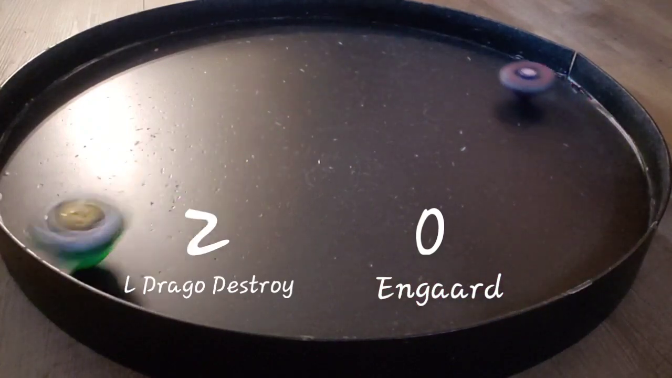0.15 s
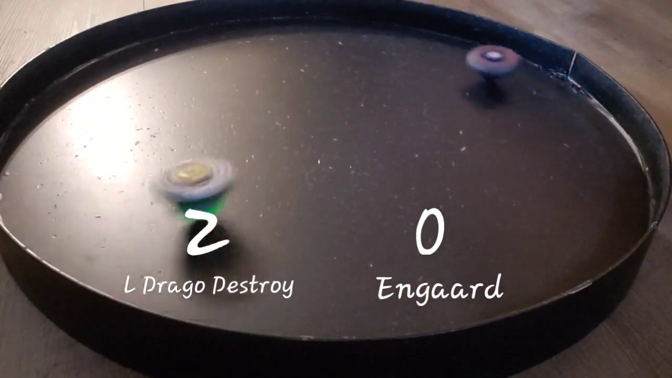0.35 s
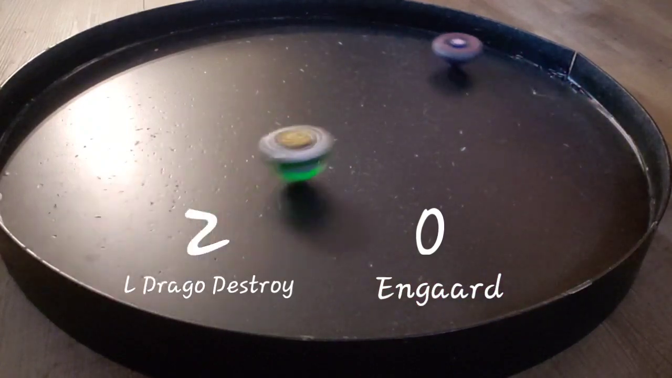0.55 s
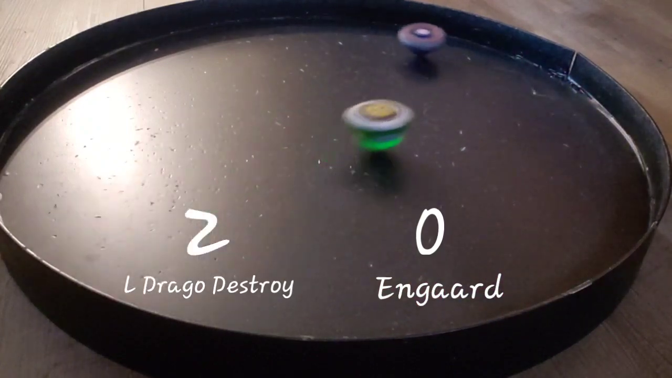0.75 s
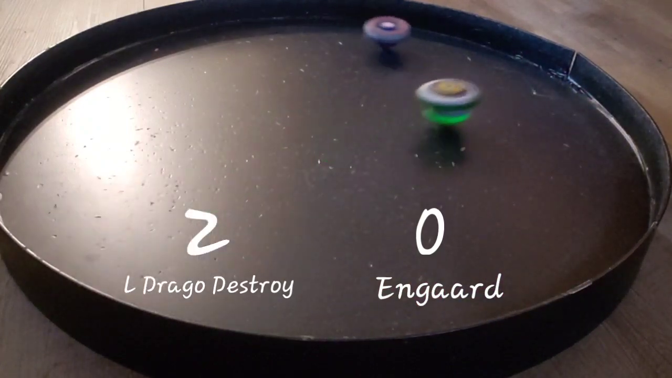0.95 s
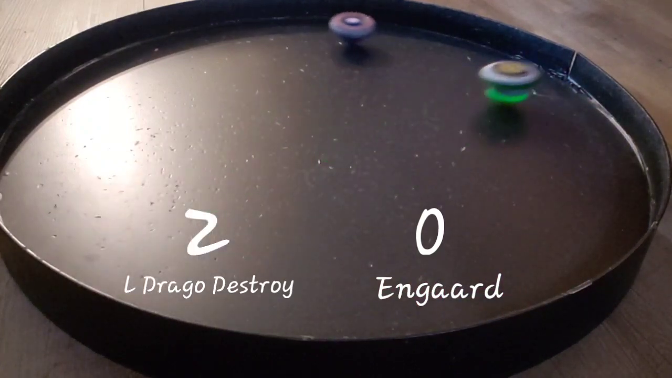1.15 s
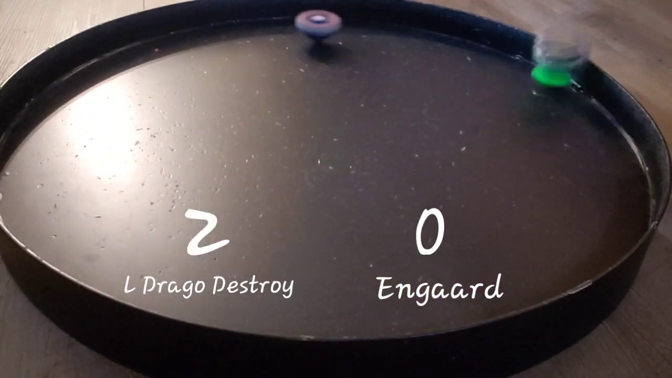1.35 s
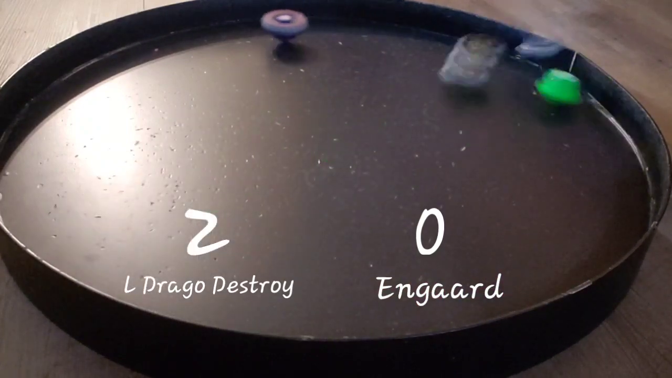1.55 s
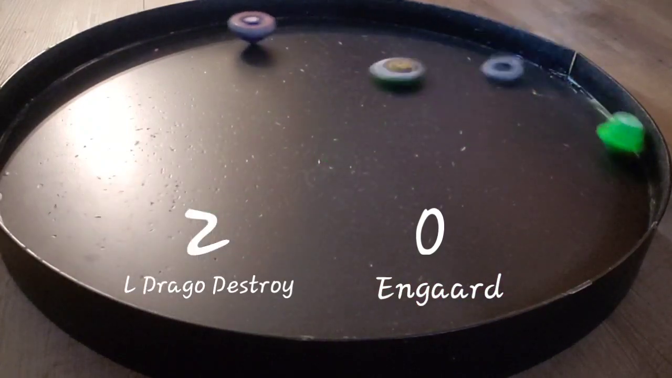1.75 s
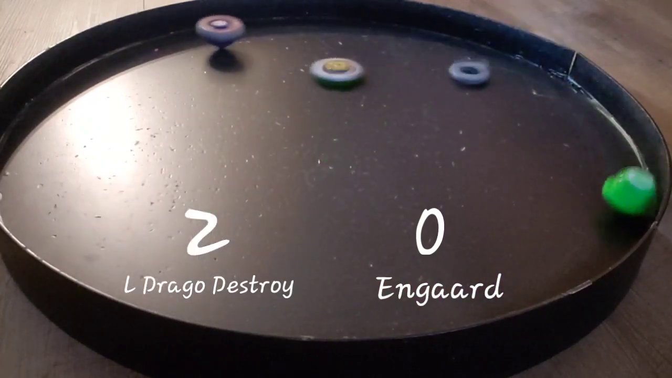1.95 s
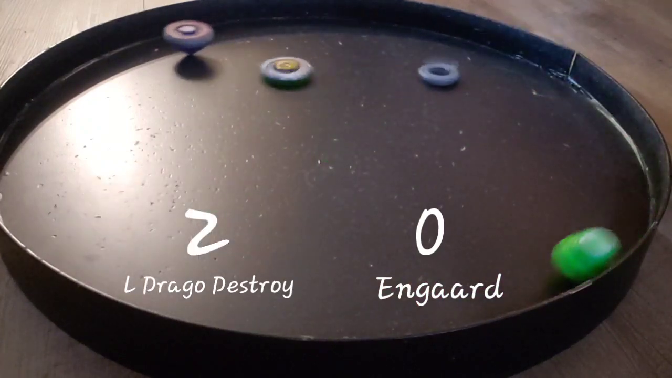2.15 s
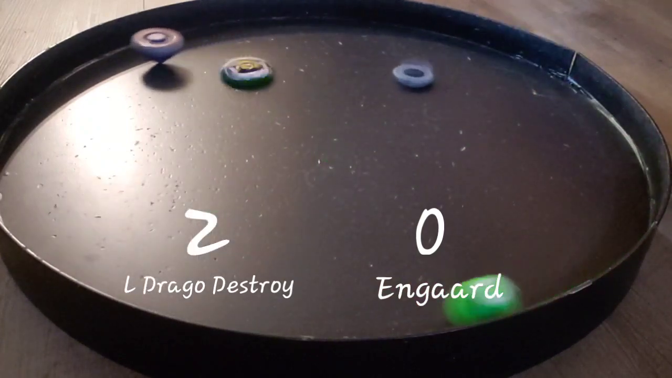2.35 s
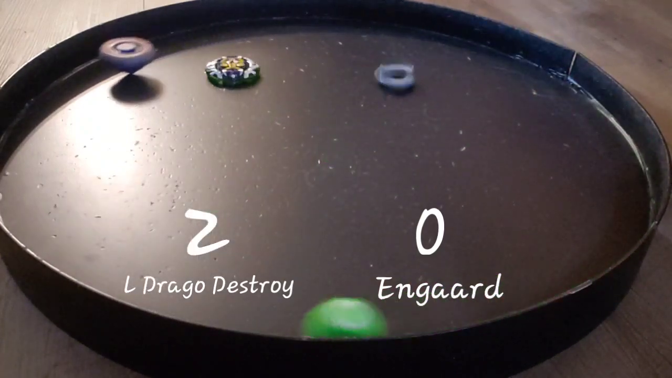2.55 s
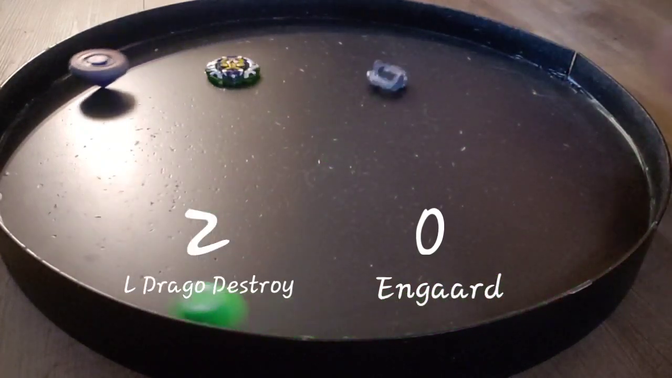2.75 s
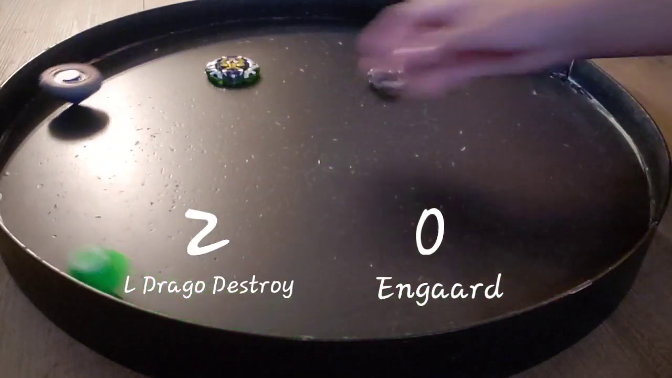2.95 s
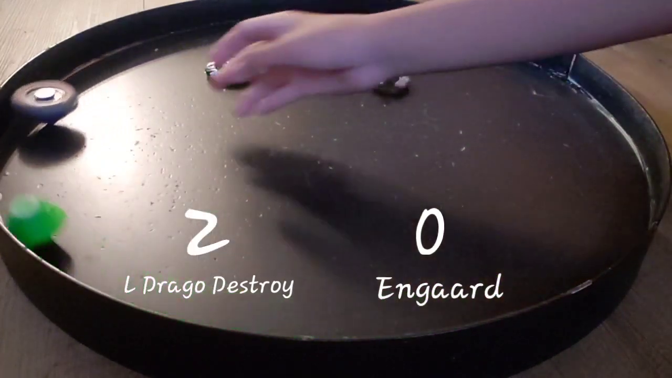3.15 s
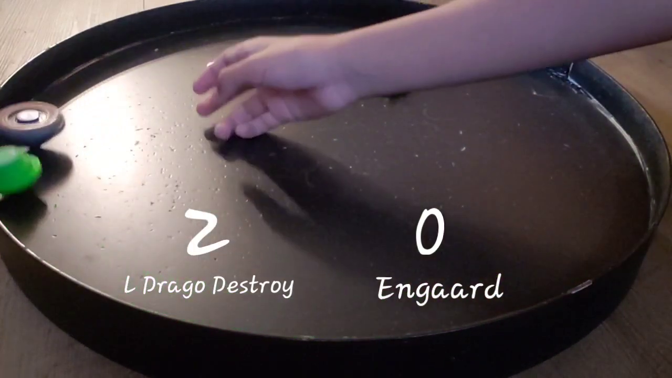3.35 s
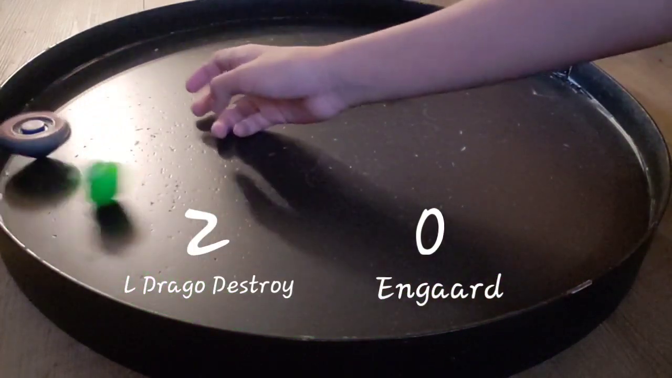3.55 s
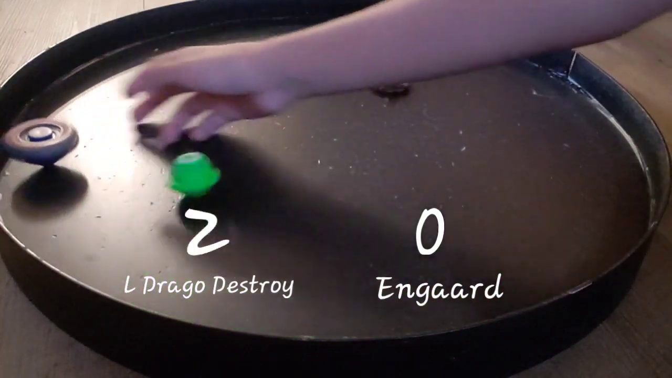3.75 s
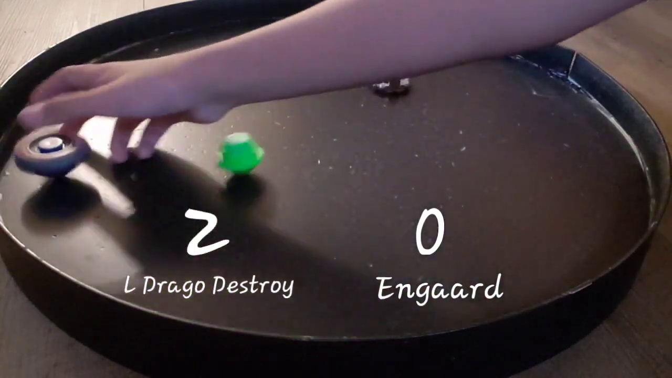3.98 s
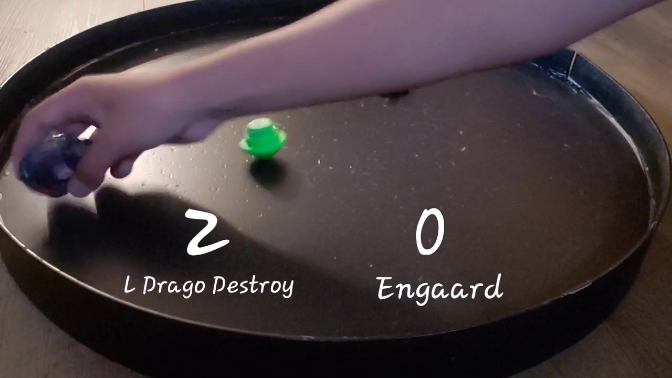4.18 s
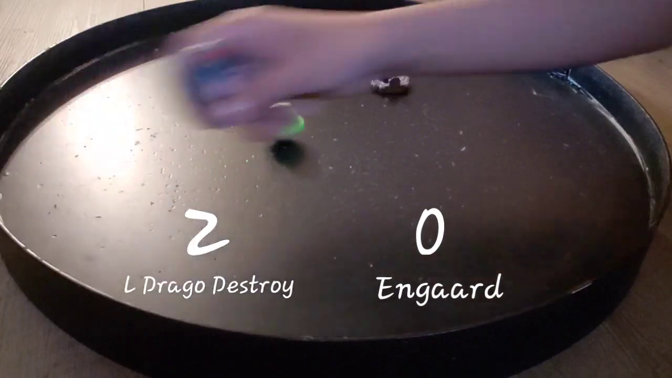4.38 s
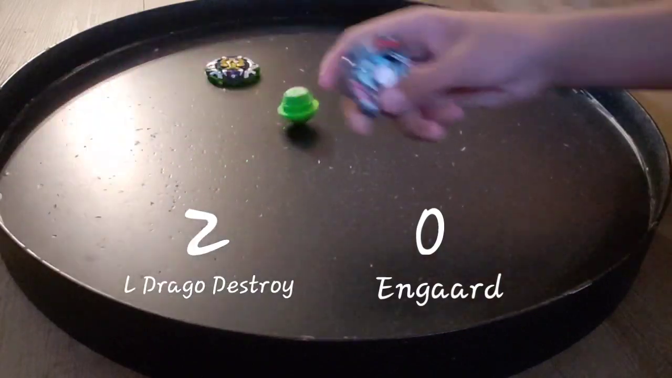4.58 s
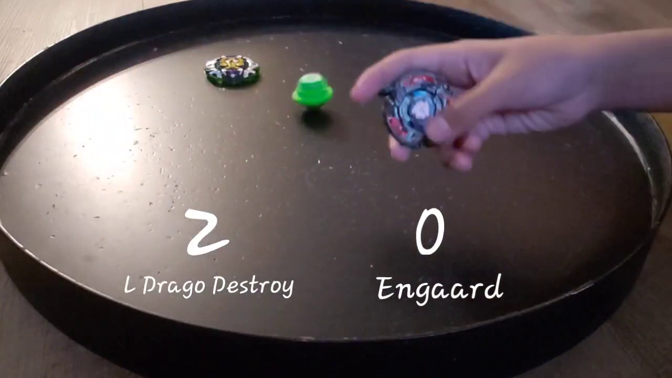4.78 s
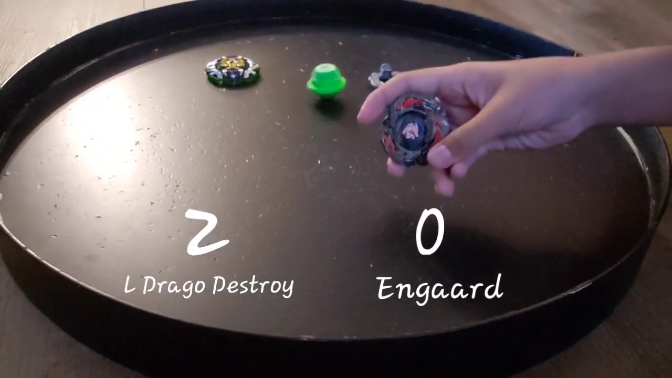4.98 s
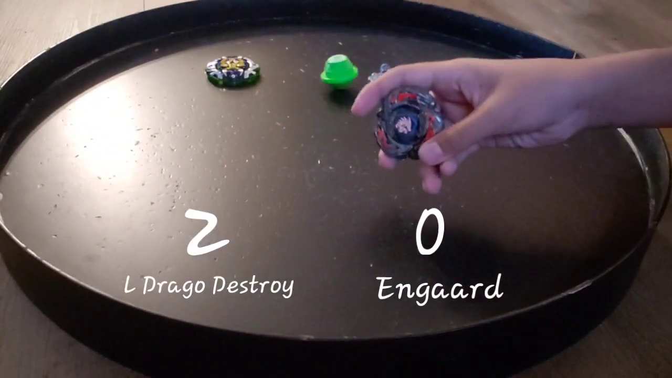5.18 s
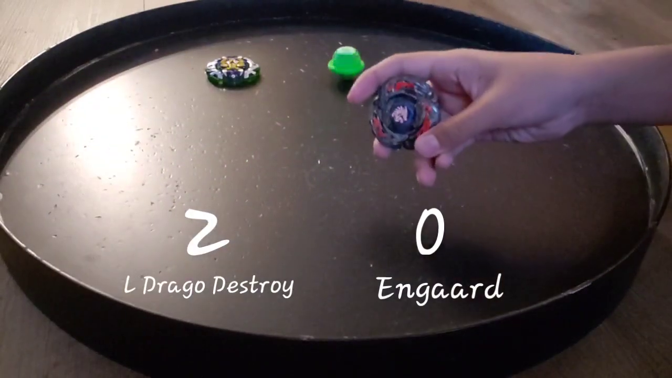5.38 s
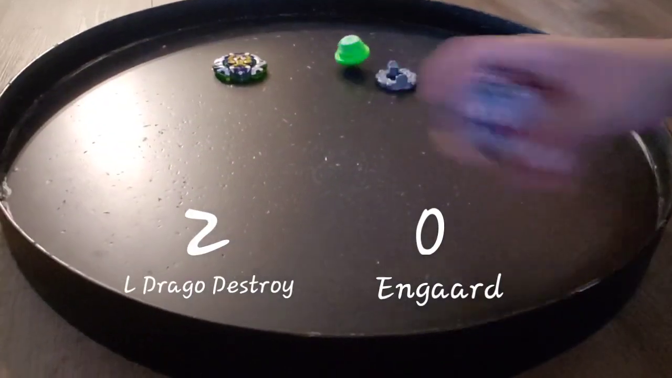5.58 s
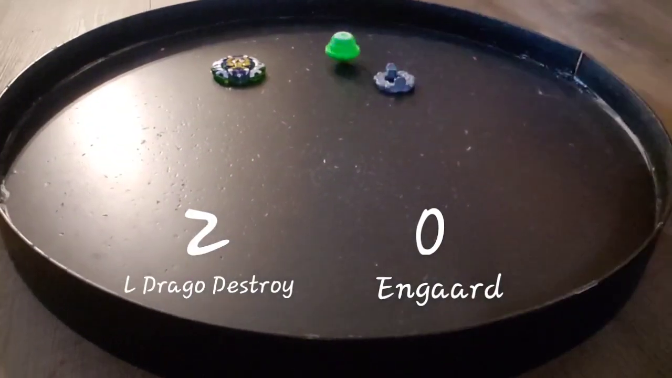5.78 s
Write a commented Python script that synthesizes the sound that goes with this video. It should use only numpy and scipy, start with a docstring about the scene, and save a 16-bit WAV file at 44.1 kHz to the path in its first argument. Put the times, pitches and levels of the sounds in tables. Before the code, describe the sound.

A toy spinning top grinds softly in a metal pan, clangs off the rim and bursts apart, its pieces knocking, rattling and ticking to rest.

```python
"""Two toy tops spin in a shallow metal pan (grinding, chirping noise with skips); one strikes the rim and bursts apart.
Clashes are bunched contact pulses that ring the pan's modes; plastic pieces knock and tumble in shaped bursts.
The loose metal wheel rasps and rings, and the plastic tip rattles round the wall in uneven taps and dry ticks.
A hand snatches the other top (a short chatter of teeth) and bumps the table (soft, deep decaying tones).
A small room answers with a diffuse tail; a low air noise runs throughout and a faint hiss comes and goes on the left."""
import sys
import numpy as np
from scipy import signal
from scipy.fft import rfft, irfft
from scipy.io import wavfile
from scipy.ndimage import uniform_filter1d

SR = 44100
rng = np.random.default_rng(int(sys.argv[2]) if len(sys.argv) > 2 else 0)


def to_wav(s):
    """Save 16-bit WAV."""
    ch = np.atleast_2d(s).T  # columns
    pcm = np.round(np.clip(ch, -1, 1) * 32767)  # PCM
    wavfile.write(sys.argv[1], SR, pcm.astype(np.int16))


N = 256662

# metal on metal and on plastic: (time [s], lead of the graze [s], level [dB], extra bass [dB],
# extra treble [dB], pitch of the struck part [Hz], boost at that pitch [dB])
CLASHES = [(0.299, 0.0029, -15.5, 2, -5.5, 1620, 8), (0.38, 0, -38.5, -22, -24, 1550, 15),
           (1.4717, 0.0029, -16.5, -3.5, -3, 1960, 5.5), (1.6119, 0.0011, -24.5, -7, -5, 1540, 9),
           (1.6234, 0.0087, -26.5, -3.5, -4, 13500, 11), (1.628, 0.0054, -26.5, -16, -1.5, 13300, 13),
           (1.7053, 0.0017, -18.5, 1, -7, 4240, 4), (1.847, 0.00087, -22.5, -14.5, -8, 3130, 8),
           (2.03, 0, -28, -12, -25, 6500, -5), (3.4505, 0.0041, -24.5, 2.5, -17.5, 1645, 15.5),
           (3.5411, 0, -28.5, 4, 3.5, 3800, 17.5), (3.552, 0.00014, -34, -12, -2, 3850, 9),
           (3.567, 0.003, -29.5, -5.5, 3.5, 1844, 12), (3.579, 0, -24.5, 2.5, -13, 1610, 15.5),
           (4.2509, 0.0026, -47.5, 1, 3.5, 560, 9), (4.318, 0.0045, -54, -7, 7, 4740, 7)]
# tone of metal contacts: (frequency [Hz], gain [dB])
CLASH_COLOUR = [(50, -30.5), (110, -13), (340, -6.5), (560, -3.5), (800, -8), (1250, -3.5), (1800, -4),
                (2500, -8), (4000, -7), (6000, -12), (8200, -17.5), (10500, -4), (13500, -11), (16000, -24)]
# tone of plastic contacts: (frequency [Hz], gain [dB])
KNOCK_COLOUR = [(50, -36), (110, -16), (200, -12), (350, -15.5), (600, -5.5), (850, -4), (1450, 3),
                (2700, 1), (3600, -1), (4300, -9), (5200, -14.5), (8200, -33), (10500, -42.5), (15000, -44)]
# modes of the pan: (frequency [Hz], t60 [s], gain struck at the left wall [dB], gain struck at the far wall [dB])
PAN_MODES = [(179.6, 0.6, -13, -22), (338, .3, -8.5, -12.5), (587, 0.28, -8, -10.5), (808, .23, -23, -7),
             (880, 0.053, -3, -13), (1133, .3, -18, -9), (1230, 0.23, -14, 0), (1450, .25, -7, -14),
             (1552, 0.21, -3.5, -4), (1750, .13, 1, -16), (1836, .35, -13.5, -5.5), (2013, 0.096, -15.5, 1),
             (2390, 0.37, -15, -9.5), (3060, .4, -12.5, -13), (4240, .25, -15.5, -13.5)]

TIME = np.arange(N) / SR


def undb(db):
    """Decibels to gain."""
    return 10 ** (np.asarray(db) / 20)


def rms(x):
    """Root mean square of a sound."""
    return np.sqrt(np.mean(x ** 2))


def unit(x):
    """Scale to rms 1."""
    return x / rms(x)


def freqs(size):
    """Frequencies of the bins of a spectrum, kept at 1 Hz or above for the logarithm."""
    return np.maximum(np.arange(size // 2 + 1) * SR / size, 1)


SIZE = 4096  # samples in one short blow
T, HZ = TIME[:SIZE], freqs(SIZE)


def along(points, hz):
    """Read (Hz, value) points on a log-frequency axis."""
    f, value = np.transpose(points)
    return np.interp(np.log(hz), np.log(f), value)


def colour(x, db):
    """Causal (minimum-phase) filter with the given gain in each bin, made by folding the cepstrum."""
    size = x.shape[-1]
    cepstrum = irfft(np.log(undb(db)), size)
    cepstrum[1:size // 2] *= 2
    cepstrum[size // 2 + 1:] = 0
    return irfft(rfft(x) * np.exp(rfft(cepstrum)), size)


def convolve(x, response):
    """Pass a sound through a response."""
    return signal.fftconvolve(x, response, axes=-1)[:, :N]


def ringing(modes):
    """Impulse response of damped modes (Hz, dB, t60 s), each with its gain at resonance."""
    t = TIME[:SR // 2]
    response = 0
    for hz, db, t60 in modes:
        peak = undb(db) * 2 * np.log(1000) / (t60 * SR)
        response = response + peak * undb(-60 * t / t60) * np.sin(2 * np.pi * hz * t)
    return response[None]


def resonance(hz, db, octaves):
    """Boost in dB around one pitch, as from a cluster of close, quickly damped modes."""
    return db / (1 + (np.log2(HZ / hz) / octaves) ** 4)


def pair(size, apart, shared_hz=700):
    """Noise at two close microphones: they share the long waves and differ in the short ones."""
    mid, side = rng.standard_normal((2, size))
    hz = freqs(size)
    side = irfft(rfft(side) * apart * (0.5 + 1.07 * hz / np.hypot(hz, shared_hz)), size)
    return np.array([mid + side, mid - side]) / np.sqrt(2)


def noise(points, apart):
    """Coloured stereo noise at rms 1."""
    return unit(colour(pair(N, apart), along(points, freqs(N))))


def wander(rate):
    """Slow chance with a spread of 1, changing about rate times a second."""
    return unit(uniform_filter1d(rng.standard_normal(N), int(SR / rate)))


def swell(start, end, db, attack, release):
    """Gain over time: rise from the start, hold until the end, then fall."""
    rise = np.clip((TIME - start) / attack, 0, 1)
    fall = np.clip(1 - (TIME - end) / release, 0, 1)
    return undb(db) * rise * fall


def add(out, s, x):
    """Mix a short sound in at time s."""
    i = int(s * SR)
    out[:, i:i + x.shape[1]] += x[:, :N - i]


def punch(x):
    """Scale a blow to rms 1 over its first 5 ms between 1.1 and 6 kHz."""
    band = signal.sosfilt(signal.butter(3, [1100, 6000], "band", fs=SR, output="sos"), x)
    return x / rms(band[:, :SR // 200])


def contact(scatter_db, scatter_s, linger_db, linger_s, dull_hz, lag=4):
    """One contact: a direct pulse, then duller waves that cross the pan and come back from its wall."""
    fade = undb(scatter_db) * np.exp(-T / scatter_s) + undb(linger_db) * np.exp(-T / linger_s)
    onset = 1 - np.exp(-T / 0.00017)
    x = colour(pair(SIZE, 0.73) * fade * onset, -10 * np.log10(1 + (HZ / dull_hz) ** 2))
    # the direct pulse reaches the right side lag samples sooner
    x[0, max(lag, 0)] -= .8
    x[1, max(-lag, 0)] -= 1
    return x


def spin(wobble_hz=36, depth=0.32, flutter_db=3.0, chirp_db=-9, chirp_spread_db=4.5):
    """The tips rub the pan unevenly, ever more softly; in each wobble they press harder and chirp."""
    # tone of the rubbing: (frequency [Hz], gain [dB])
    spin_colour = [(40, -14.5), (130, -7), (270, 3), (350, -8), (460, 1), (700, -15.5), (1200, -23.5),
                   (1500, -8), (1680, -24.5), (1850, -16), (2400, -25.5), (4400, -26.5), (5200, -24),
                   (6500, -48.5), (12000, -35), (16000, -44.5)]
    # tone of the chirp: (frequency [Hz], gain [dB])
    chirp_colour = [(1150, -15.5), (1550, 0.5), (2400, -14), (4400, -11.5), (5150, 0), (6200, -27.5),
                    (9000, -40.5)]
    start_db, sag_db_per_s = -53.5, 2.4
    end_s, stop_s = 3.773, 0.11  # the grind fades out over stop_s from end_s
    phase = np.cumsum(wobble_hz * (1 + 0.1012 * wander(7.3))) / SR
    press = np.sin(2 * np.pi * phase)
    level = undb(start_db - sag_db_per_s * TIME + flutter_db * wander(8.2))
    level = level * np.clip(1 - (TIME - end_s) / stop_s, 0, 1)
    chirp_level = np.maximum(press, 0) ** 2 * undb(chirp_db + chirp_spread_db * wander(25))
    chirp = noise(chirp_colour, 0.52) * chirp_level
    rub = noise(spin_colour, 0.4) * (1 + depth * press)
    return (rub + chirp) * level


def room_air(lean_db=1.5):
    """Steady low hum of the air, coloured noise leaning a little to the right."""
    # tone of the air: (frequency [Hz], gain [dB])
    air_colour = [(20, -22), (38, -12), (58, 5.5), (90, -15), (180, -2), (300, -15.5), (600, -24.5),
                  (1400, -33.5), (2200, -28), (3200, -35), (5000, -38), (8000, -48), (11000, -35),
                  (16000, -37)]
    return undb(-68.5) * noise(air_colour, 0.36) * undb([[-lean_db], [lean_db]])


def skips(skid_db=-17, skid_s=0.018):
    """A spinning tip skips over a scratch: a hollow tock, a momentary skid and one lighter hop."""
    # skips: (time [s], level [dB], extra treble [dB])
    landings = [(.106, -51, -1.5), (0.269, -51.5, -10), (.622, -52, -23), (0.777, -55.5, -36),
                (.816, -64, -25), (0.8895, -48, -15), (0.987, -52.5, -6), (1.018, -51.5, -14),
                (1.076, -45.5, -11.5), (1.204, -47, -11), (2.369, -54, -1), (2.999, -48, -7)]
    # extra body of a skip: (frequency [Hz], gain [dB])
    body = [(450, 10), (900, 8), (1200, -0.5), (1550, 5), (2500, -1.5)]
    hop_s, hop_db = 0.039, -9  # the second landing
    out = np.zeros((2, N))
    for s, db, treble_db in landings:
        shade = along(body + [(5500, 0), (9000, treble_db)], HZ)
        for hop in range(2):
            tock = contact(-11, 0.0036, skid_db, skid_s, 9000)
            tock = colour(tock, along(CLASH_COLOUR, HZ) + shade)
            add(out, s + hop * hop_s, undb(db + hop * hop_db) * punch(tock))
    return out


def strike(db, bass_db, treble_db, hz, ring_db, ring_octaves=0.17, scatter_db=-12, linger_db=-25, count=3):
    """Wheel teeth catch several times in a few ms; the struck part rings in a cluster of close modes."""
    shade = along([(330, bass_db), (900, 0), (4500, 0), (10000, treble_db)], HZ)
    ring = resonance(hz, ring_db, ring_octaves)
    x = np.zeros((2, SIZE))
    for tooth in range(count):
        delay = int(tooth * rng.uniform(.0005, .0011) * SR)
        bite = contact(scatter_db, .002, linger_db, .012, 16000, lag=0)
        x += .8 ** tooth * np.roll(bite, delay, axis=1)
    return undb(db) * punch(colour(x, along(CLASH_COLOUR, HZ) + shade + ring))


def clashes():
    """A spinning wheel grazes first, then bites with several teeth; a square hit clicks only once."""
    graze_db, graze_bass_db, graze_treble_db = -7, -8, 3.5  # a lighter, brighter touch than the bite
    out = np.zeros((2, N))
    for s, lead, db, bass_db, treble_db, hz, ring_db in CLASHES:
        if lead > 0:
            graze = strike(db + graze_db, bass_db + graze_bass_db, treble_db + graze_treble_db, hz, ring_db)
            add(out, s - lead, graze)
            add(out, s, strike(db, bass_db, treble_db, hz, ring_db))
        else:
            click = strike(db, bass_db, treble_db, hz, ring_db, scatter_db=-20, linger_db=-32, count=1)
            add(out, s, click)
    return out


def clang(far, scatter_db=1):
    """Pan modes after a blow on the wall: the spot sets their balance, the higher ones differ by side."""
    t, out = TIME[:SR // 2], 0
    for hz, t60, left_db, far_db in PAN_MODES:
        split = min(hz / 1500, 1) * rng.uniform(.3, 1.2)  # phase offset of each side [rad]
        phase = rng.uniform(0, 2 * np.pi) + split * np.array([[1], [-1]])
        db = (far_db if far else left_db) + scatter_db * rng.standard_normal()
        out = out + undb(db - 60 * t / t60) * np.sin(2 * np.pi * hz * t + phase)
    return out * (1 - np.exp(-t / .001))


def clangs(clang_db=-16.5):
    """Each glancing clash sets the pan ringing, in step with its force."""
    out = np.zeros((2, N))
    for s, lead, db, *_ in CLASHES:
        if lead > 0:
            far = 1 < s < 2.5  # blows in this span [s] land on the far wall
            add(out, s, undb(db + clang_db) * clang(far))
    return out


def roll(rate=175, spread_db=1.0, count=16):
    """The ribbed tip trundles along the wall: ribs tap unevenly, each time on one of many spots of the pan."""
    # tone of the taps: (frequency [Hz], gain [dB])
    roll_colour = [(50, -36.5), (170, -12), (350, -9), (600, 3), (900, -2), (1450, 4.5), (2300, 0.5),
                   (3600, -11), (4800, -27), (8200, -41.5), (10500, -35.5), (15000, -43)]
    times = np.cumsum(rng.uniform(.25, 1.75, 2000)) / rate
    at = (times[times < TIME[-1]] * SR).astype(int)
    strength = undb(spread_db * np.clip(rng.standard_normal(len(at)), -2, 1.4))
    spot = rng.integers(count, size=len(at))
    out = np.zeros((2, N))
    for k in range(count):
        taps = np.zeros((1, N))
        taps[0, at] = strength * (spot == k)
        tap = contact(-22, .0025, -31, .013, 2200, lag=1)
        out += convolve(taps, colour(tap, along(roll_colour, HZ)))
    return unit(out) * swell(start=1.65, end=3.49, db=-39.5, attack=.039, release=.014)


def wheel(rate=260, rasp_db=-1, flutter_db=2):
    """The loose metal wheel rolls on its edge: random taps ring its modes over a fine rasp, then it settles."""
    # modes of the wheel: (frequency [Hz], relative gain [dB], t60 [s])
    wheel_modes = [(6430, -4.5, .06), (6480, -7.5, .08), (9580, -11, 0.016)]
    start_s, end_s, attack_s, release_s = 1.655, 3.59, 0.044, 0.35
    landing_db, fade_db_per_s, floor_db = -49, 21, -78.5  # the landing fades towards a faint floor
    taps = (rng.random(N) < rate / SR) * rng.normal(1, 0.67, (2, N))
    rasp_colour = [(3000, -33.5), (6500, -1.0), (8200, -11.0), (9800, -3.5), (13000, -5.0), (16000, -21.0)]
    rasp = noise(rasp_colour, 0.57)
    ring = unit(convolve(taps, ringing(wheel_modes)))
    settle = undb(landing_db - fade_db_per_s * (TIME - start_s)) + undb(floor_db)
    level = settle * swell(start_s, end_s, flutter_db * wander(20), attack_s, release_s)
    return (ring + undb(rasp_db) * rasp) * level


def knock(db, hardness, scatter_db, lag):
    """Plastic on the pan: a harder corner gives a brighter knock, and a second corner follows."""
    rebound_s, rebound_db = .0062, -7.5  # typical gap, and level of the second corner
    octaves = np.log2(np.clip(HZ, 1000, 7000) / 2200)
    first, second = (contact(scatter_db, .0018, scatter_db - 13, .007, 4500, lag) for corner in range(2))
    delay = int(rebound_s * rng.uniform(0.73, 1.25) * SR)
    x = first + undb(rebound_db) * np.roll(second, delay, axis=1)
    return undb(db) * punch(colour(x, along(KNOCK_COLOUR, HZ) + hardness * octaves))


def knocks():
    """Loose pieces drop and bounce on the pan; strong knocks are brighter and send relatively weaker waves."""
    # bounces: (time [s], level [dB])
    bounces = [(1.678, -24), (1.7405, -13.5), (1.7895, -24), (1.801, -24.5), (1.8468, -16), (1.8909, -19),
               (1.9209, -21), (1.9618, -20.5), (2.003, -24.5), (2.0313, -20), (2.038, -28.5),
               (2.0687, -26.5), (2.1501, -23), (5.573, -72.5)]
    light_db = -33.5  # level of a light knock
    hardness_db, harder_per_db = -.5, 0.16  # brightness of a light knock [dB per octave], its rise with force
    scatter_db, scatter_per_db = -8.5, -0.23  # waves across the pan from a light knock, their change with force
    out = np.zeros((2, N))
    for s, db in bounces:
        force = max(db - light_db, 0)
        hardness = hardness_db + harder_per_db * force
        add(out, s, knock(db, hardness, scatter_db + scatter_per_db * force, lag=3))
    return out


def tumbles(ring_hz=1250, ring_db=2, scuff_s=0.0039):
    """A piece tumbles end over end: an even run of short, blunt scuffs, one per turn, on a level curve."""
    # runs: (start [s], end [s], turn [s], loudest at [s], loudest level [dB], fade by the end [dB],
    # hardness [dB per octave])
    runs = [(2.065, 2.28, .0281, 2.11, -32.5, -1.5, 3.5), (3.639, 3.808, .0266, 3.70, -34, 10.5, -8.5)]
    out = np.zeros((2, N))
    octaves = np.log2(np.clip(HZ, 1500, 7000) / 2200)
    for start, end, turn_s, loudest_s, db, fade_db, hardness in runs:
        shade = along(KNOCK_COLOUR, HZ) + hardness * octaves + resonance(ring_hz, ring_db, .2)
        for s in np.arange(start, end, turn_s):
            off_peak = (s - loudest_s) / (end - loudest_s)
            scuff = contact(0, scuff_s, -30, .008, 4500, lag=0)
            add(out, s, undb(db - fade_db * off_peak ** 2) * punch(colour(scuff, shade)))
    return out


def raps(ring_hz=2500, ring_db=5, scatter_db=-15):
    """Dry, separate ticks of the tip on the wall, varying randomly in pitch."""
    # ticks: (time [s], level [dB])
    ticks = [(2.2635, -31.5), (2.2922, -29), (2.3115, -35.5), (2.388, -28.5), (2.4505, -29.5),
             (2.4543, -31.5), (2.4881, -29), (2.5252, -34), (2.5411, -39), (2.556, -33.5), (2.5642, -29.5),
             (2.6116, -34.5), (2.618, -30.5), (2.6488, -35), (2.662, -31), (2.669, -30.5), (2.6767, -46),
             (2.712, -32.5), (2.723, -29.5), (2.7296, -37), (2.7664, -34.5), (2.776, -30), (2.7823, -32.5),
             (2.8047, -30.5), (2.8476, -38), (2.9228, -31.5), (2.941, -39), (3.0168, -32), (3.0225, -35.5),
             (3.0527, -37.5), (3.0855, -35.5), (3.0903, -32), (3.1463, -34.5), (3.2067, -31.5),
             (3.247, -31.5), (3.263, -31), (3.2699, -31.5), (3.2949, -31), (3.3096, -31.5), (3.3156, -32.5),
             (3.3299, -29.5), (3.3695, -31.5), (3.406, -32), (3.434, -29.5), (3.4703, -29.5), (3.487, -38)]
    # the tip crosses from right to left: (time [s], lag of the left side [samples])
    crossing = [(2.1, 2), (2.7, 2.5), (3.4, -4)]
    out = np.zeros((2, N))
    for s, db in ticks:
        lag = int(round(np.interp(s, *np.transpose(crossing))))
        ring = resonance(ring_hz * 2 ** rng.uniform(-.5, .5), ring_db, .3)
        tick = contact(scatter_db, .0018, scatter_db - 15, .006, 4500, lag)
        add(out, s, undb(db) * punch(colour(tick, along(KNOCK_COLOUR, HZ) + ring)))
    return out


def hiss(grain_db=1.6):
    """A faint, narrow, grainy hiss that swells, and ticks once, in the left microphone only."""
    # swells: (start [s], end [s], level [dB], attack [s], release [s])
    swells = [(4.109, 4.25, -70, 0.035, 0.13), (4.407, 4.576, -66.5, 0.073, 0.21),
              (4.751, 5.298, -65, 0.1, 0.38), (5.242, 5.242, -51.5, 0.0017, 0.0039),
              (5.494, 5.819, -66, 0.22, 0.13)]
    # tone of the hiss: (frequency [Hz], gain [dB])
    hiss_colour = [(300, -33), (1400, -20.5), (2150, 1), (3200, -6), (4500, -21.5), (8000, -39.5)]
    level = sum(swell(*row) for row in swells) * undb(grain_db * wander(100))
    left_only = np.array([[1], [0]])
    return noise(hiss_colour, 1) * level * left_only


def grab(rate=1500, bass_db=12):
    """Fingers press the top to the pan: its teeth chatter on the metal in a dense burst of random ticks."""
    teeth = (rng.random(N) < rate / SR) * rng.standard_normal((1, N))
    shade = along([(600, bass_db), (2000, 0)], HZ)
    tick = colour(contact(-16, .002, -29, .012, 16000), along(CLASH_COLOUR, HZ) + shade)
    chatter = unit(convolve(teeth, tick))
    return chatter * swell(start=4.241, end=4.255, db=-48, attack=.007, release=.055)


def bumps(rise_cycles=0.64):
    """The hand pushes the table under the pan: a short tock, with deep modes that build up just after."""
    # pushes: (time [s], relative level [dB], extra deep bass [dB], extra midrange [dB])
    pushes = [(4.25, -44.5, -16, -3.5), (4.73, -61, -1, -20), (5.239, -61, -8, -13),
              (5.591, -51.5, 2, -6.5), (5.6457, -49.5, 0, -3), (5.785, -60.5, 4, -12)]
    # modes of the table: (frequency [Hz], relative gain [dB], t60 [s])
    table_modes = [(74, 3.5, 0.097), (193.3, -2, 0.084), (511.4, -5, 0.043), (1142, -22, .03)]
    out = np.zeros((2, N))
    for s, db, deep_db, mid_db in pushes:
        for hz, mode_db, t60 in table_modes:
            tilt_db = along([(80, deep_db), (200, 0), (500, mid_db)], hz)
            decay = undb(db + mode_db + tilt_db - 60 * T / t60)
            rise = 1 - np.exp(-(T * hz / rise_cycles) ** 2)
            tone = decay * rise * np.sin(2 * np.pi * hz * T)
            add(out, s, tone[None] * 2)
    return out


def room(build_s=0.0016):
    """Diffuse tail of the room: noise in octave bands, each with its own decay, scaled to unit energy."""
    # room decay: (frequency [Hz], t60 [s])
    room_t60 = [(100, 0.18), (300, 0.56), (800, 0.42), (2000, 0.4), (5000, 0.42), (13000, 0.32)]
    size = SR * 3 // 4
    t = TIME[:size]
    octave = np.log2(np.clip(freqs(size), 125, 16000) / 125)
    spectrum, tail = rfft(pair(size, 0.53)), 0
    for k in range(8):
        band = irfft(spectrum * np.maximum(1 - abs(octave - k), 0), size)
        tail = tail + band * undb(-60 * t / along(room_t60, 125 * 2 ** k))
    tail = tail * (1 - np.exp(-(t / build_s) ** 2))
    return unit(tail) / np.sqrt(size)


def scene():
    """Contacts ring the pan, the room answers, and the air and hiss lie on top."""
    blows = skips() + roll() + tumbles() + knocks() + raps() + grab()
    pan = ringing([(hz, far_db, t60) for hz, t60, left_db, far_db in PAN_MODES])
    pan_ring = undb(-1.5) * convolve(blows, pan)
    near = blows + pan_ring + clashes() + clangs() + bumps() + spin() + wheel()
    sound = near + undb(-6.5) * convolve(near, room())
    lean_db = 0.9  # the pan lies a little to the right
    return sound * undb([[-lean_db], [lean_db]]) + room_air() + hiss()


def record(dry):
    """The recorder rounds the highest peaks and cuts the top above 15.9 kHz."""
    rounded = dry / (1 + (dry / .9) ** 4) ** .25
    return signal.sosfilt(signal.ellip(8, .2, 70, 15900, fs=SR, output="sos"), rounded)


dry = scene()
out = record(dry)
to_wav(out)
```